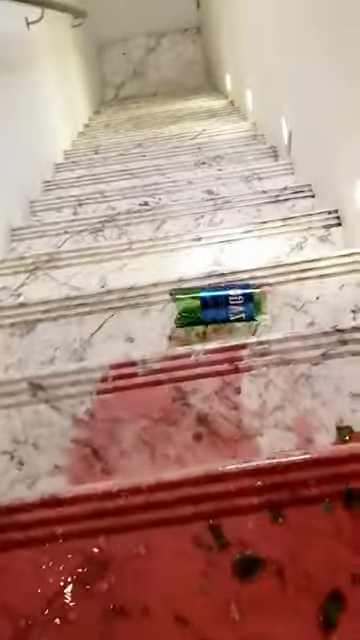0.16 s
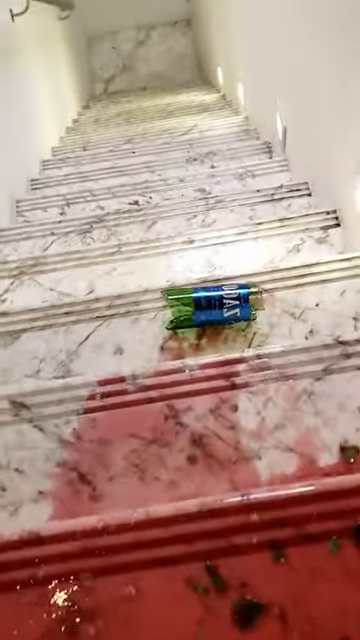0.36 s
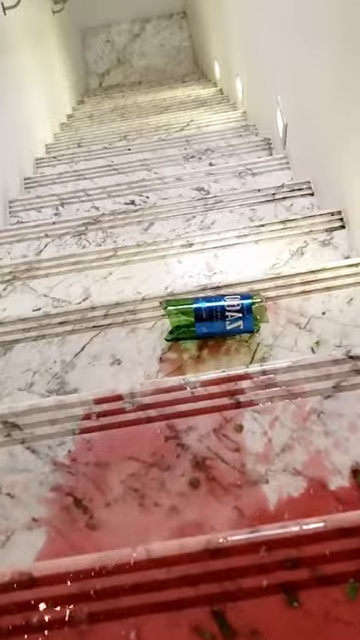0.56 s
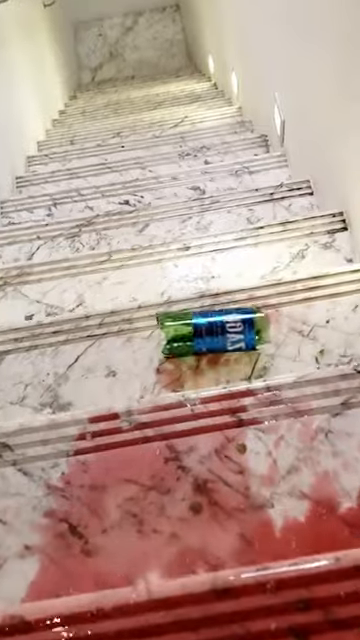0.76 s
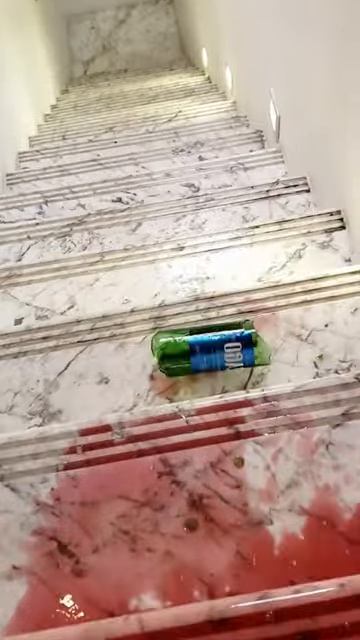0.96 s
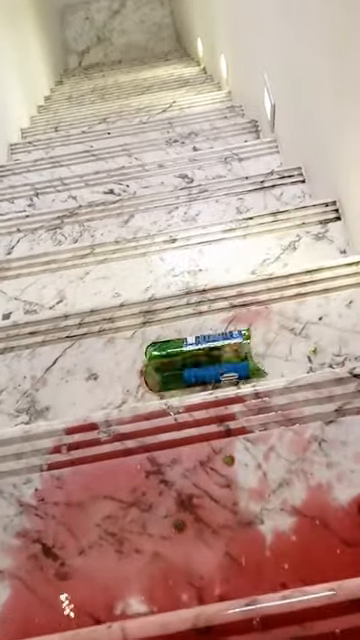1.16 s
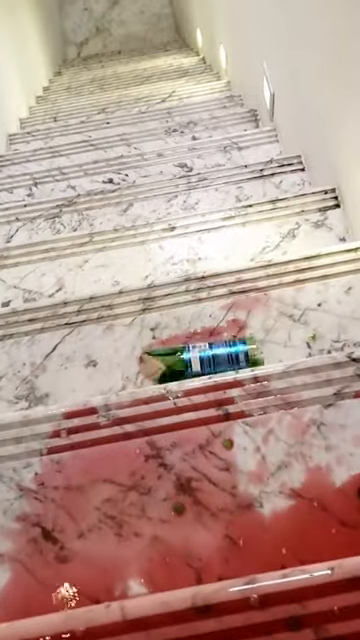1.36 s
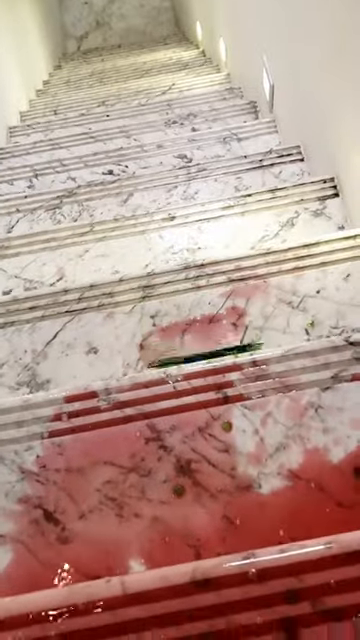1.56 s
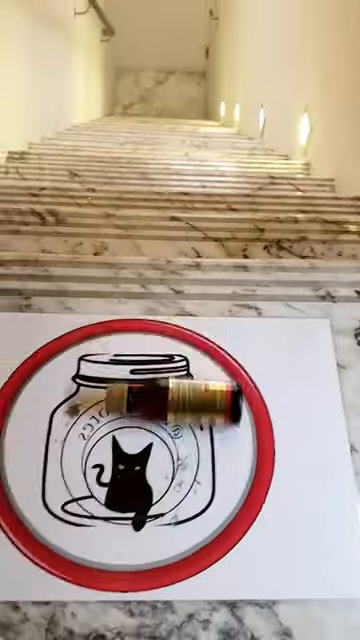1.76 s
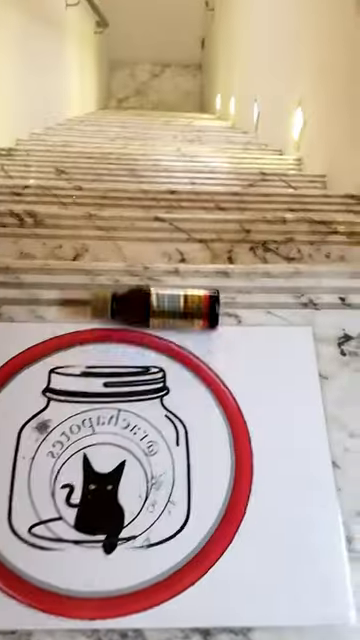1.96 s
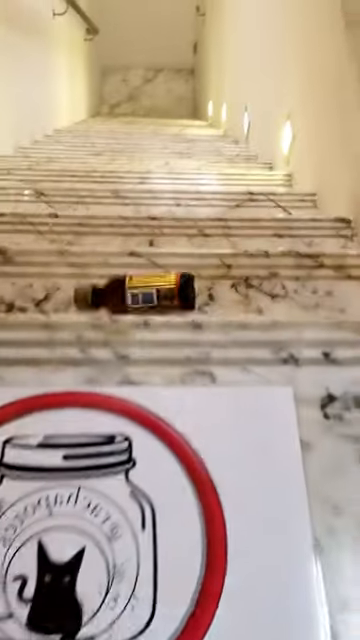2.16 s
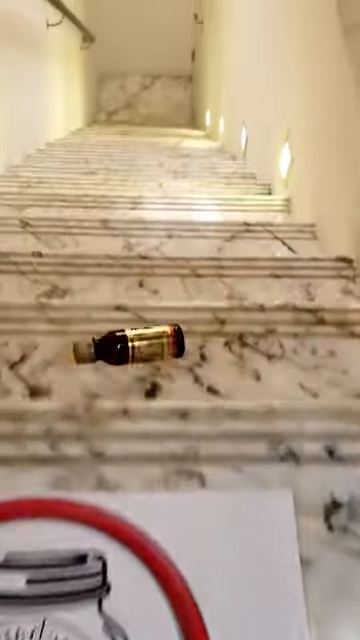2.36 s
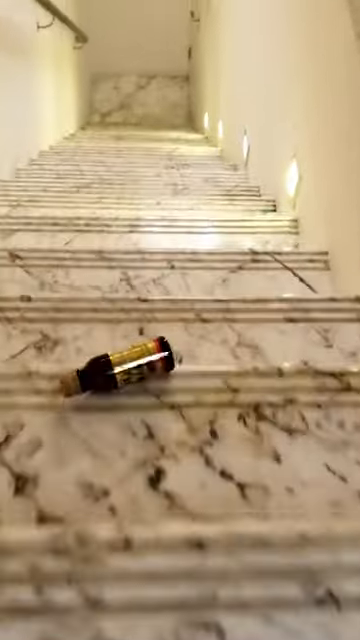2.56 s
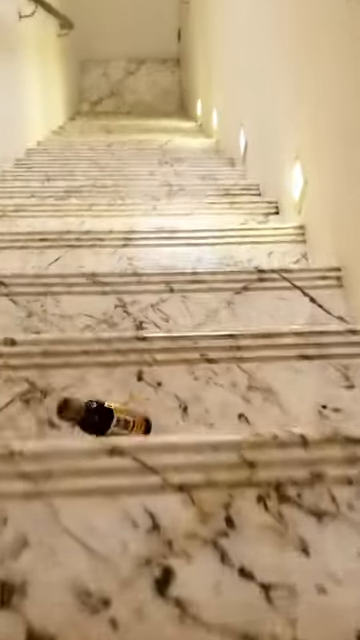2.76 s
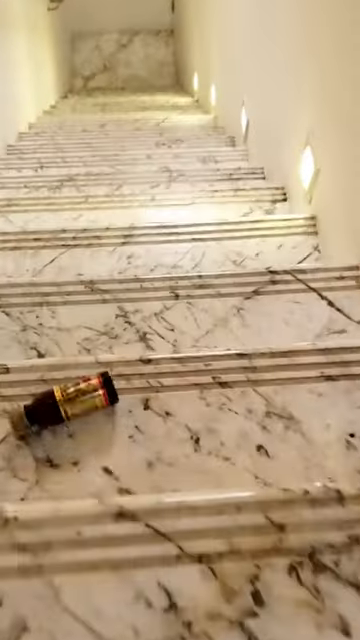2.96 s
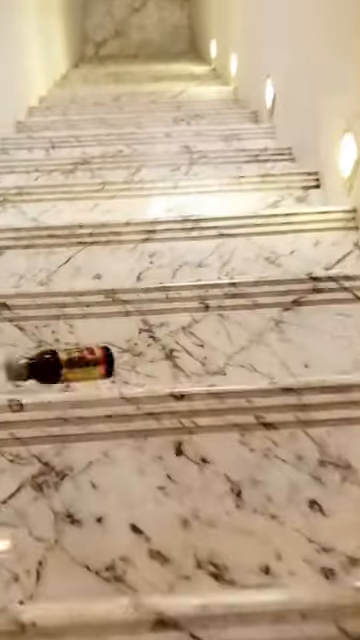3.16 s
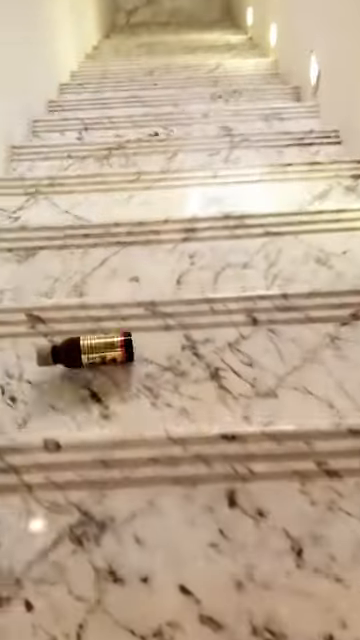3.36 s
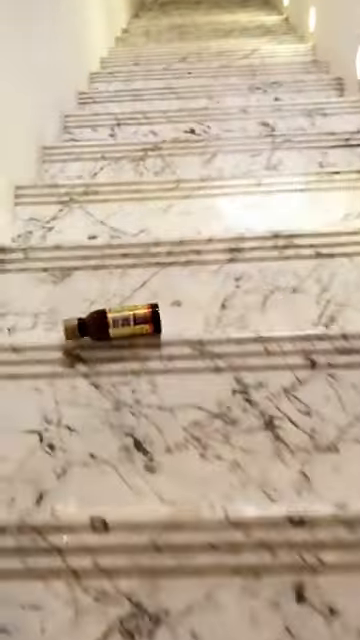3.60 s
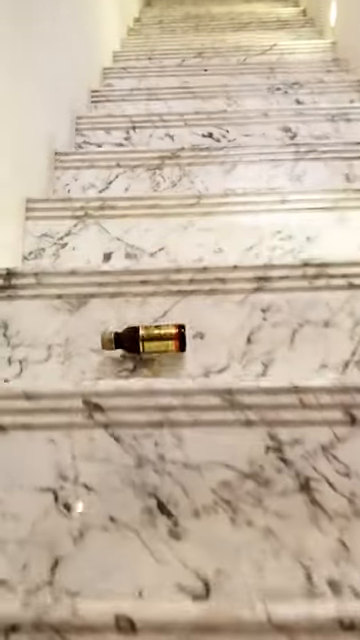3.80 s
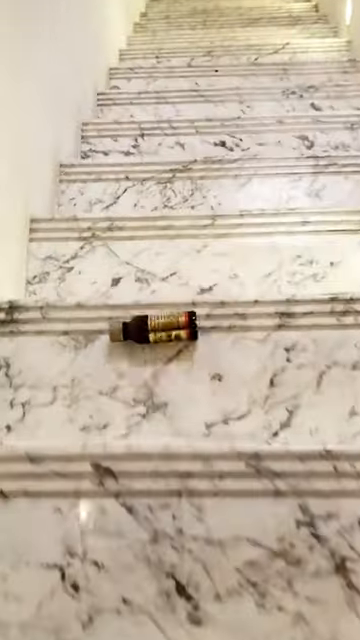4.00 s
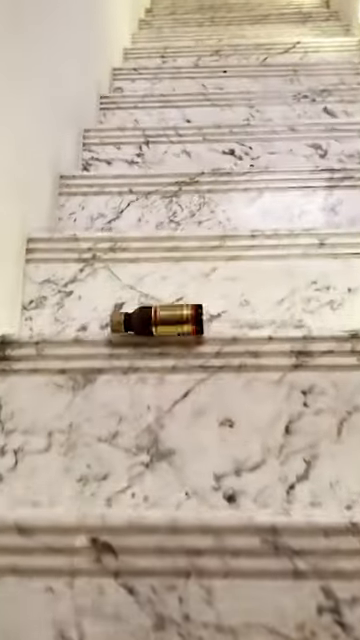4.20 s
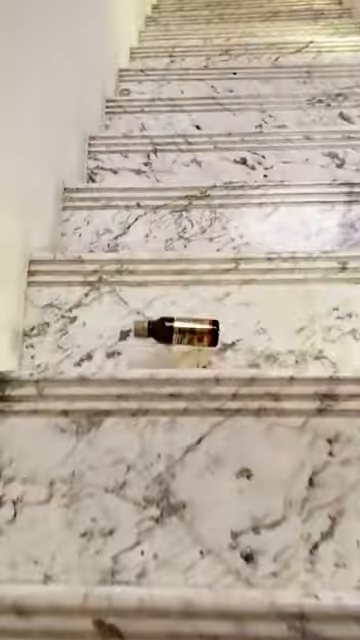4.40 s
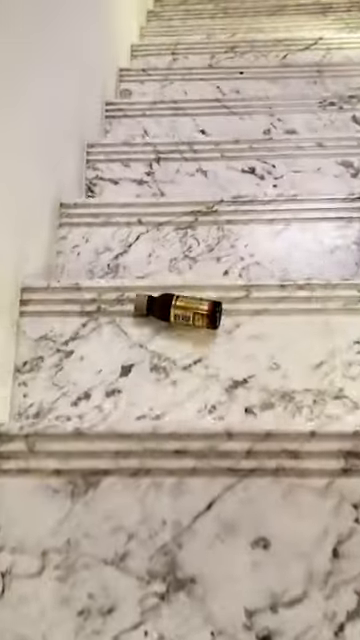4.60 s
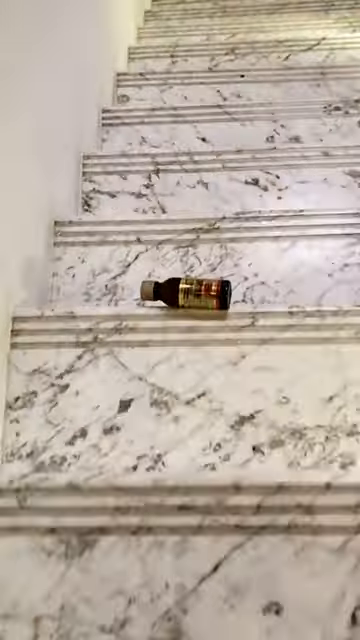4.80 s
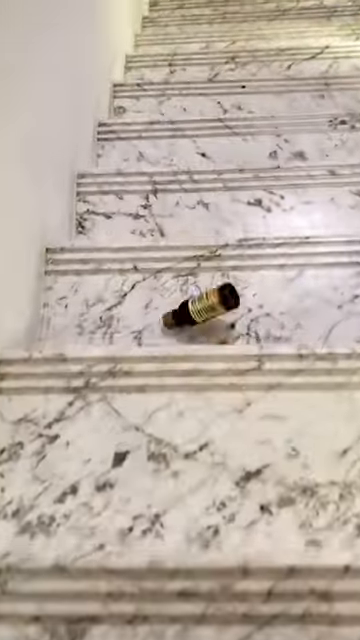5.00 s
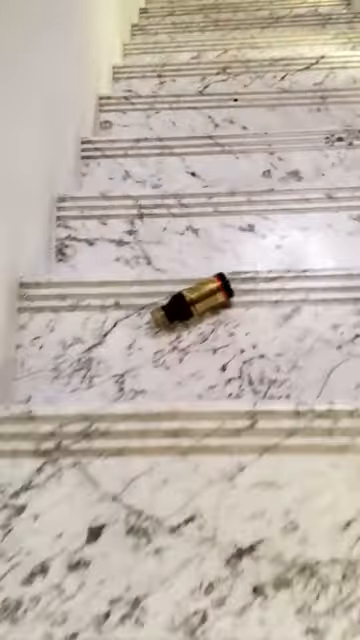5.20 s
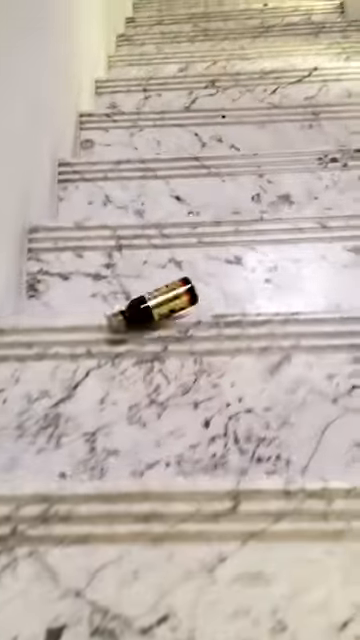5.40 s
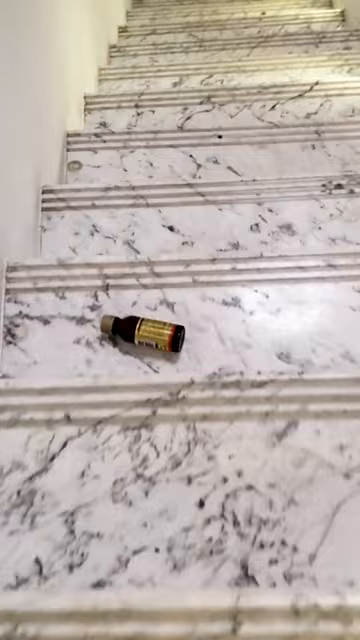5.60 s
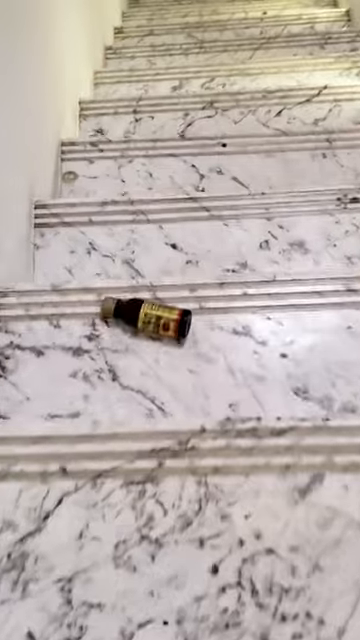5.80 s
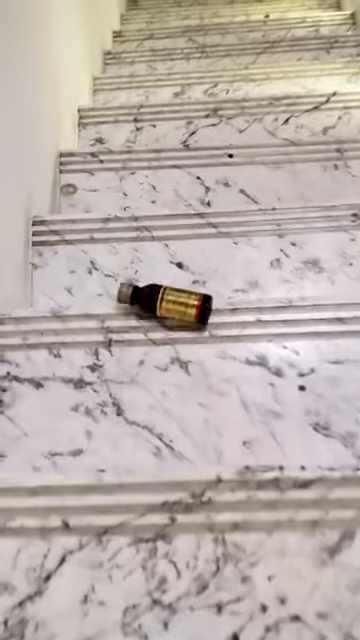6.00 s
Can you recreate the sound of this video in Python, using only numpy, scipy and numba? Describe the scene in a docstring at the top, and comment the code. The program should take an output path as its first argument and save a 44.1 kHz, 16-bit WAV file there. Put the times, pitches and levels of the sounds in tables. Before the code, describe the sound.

A glass bottle bumps faintly down stone steps over a low hum, then another clatters down with sharp, echoing knocks and clinks.

```python
"""Two glass bottles, one after the other, tumble down a marble staircase in a tall, echoing stairwell. First a
green bottle bumps down over a low hum and the hiss of the air. Each blow of glass on stone gives a short knock,
a few ringing tones and a long wash of echo. The hum stops just before the scene changes at about 1.83 s: a
brown bottle then clatters down, with soft thuds of hands and feet beneath it. All along, an automatic gain
control flattens the loud part of every echo."""
import sys
import numpy as np
from scipy import signal
from scipy.fft import rfft, irfft
from scipy.io import wavfile
from scipy.ndimage import uniform_filter1d
from numba import njit

SR = 44100
rng = np.random.default_rng(int(sys.argv[2]) if len(sys.argv) > 2 else 0)


def int16_out(signal):
    """Quantize to a 16-bit WAV file."""
    q = np.round(np.clip(np.atleast_2d(signal).T, -1, 1) * 32767)
    wavfile.write(sys.argv[1], SR, q.astype(np.int16))


N = 266805
T = np.arange(0, N + 32, 32) / SR  # coarse time steps for loudness curves
HZ = np.fft.rfftfreq(N, 1 / SR)

# Tone colour of the air behind the green bottle, then the brown one: f/Hz, level/dB
GREEN_AIR = [(59, 10), (100, 3.5), (160, 2), (197, -17), (255, -4.5), (583, -16), (5080, -68),
             (10900, -18.5), (16000, -12.5)]
BROWN_AIR = [(25, -5), (60, 2), (120, -5), (250, -5), (500, -5.5), (1500, -17), (6000, -21), (16000, -31.5)]
# Tone colour of the low noise in the hum and the thuds: f/Hz, level/dB
RUMBLE_COLOUR = [(40, -2), (120, -3.5), (200, -8), (350, -18.5), (600, -43)]
# The four tones of the hum: f/Hz, level/dB
HUM_TONES = [(39, -2), (64, -7), (103, 0), (151, -6.5)]
# How they swell: t/s, level of the lowest two/dB, level of the third/dB, level of the fourth/dB
HUM_SWELL = [(0.0, -53, -74, -46), (0.098, -45, -61, -70), (0.196, -41.5, -49, -54),
             (0.704, -35, -45.5, -33), (0.828, -30, -34, -69), (1.416, -30, -41, -52),
             (1.74, -35, -37.5, -54), (1.76, -42, -53, -29)]
# Thuds of hands and feet: t/s, level/dB, length/s
SOFT_THUDS = [(1.935, -39, 0.08), (2.662, -33, 0.024), (2.852, -41, 0.061), (3.084, -38, 0.018),
              (3.229, -42, 0.023), (3.738, -41, 0.06), (3.865, -36, 0.015), (4.164, -42, 0.03),
              (4.445, -46, .06), (5.102, -46, 0.037), (5.282, -41, 0.09), (5.53, -39, .03),
              (6.02, -33.5, 0.062)]
# Tone colour of the echo: f/Hz, level/dB
ECHO_COLOUR = [(120, -64), (200, -15.5), (491, -14), (538, -12.5), (590, -13.5), (1120, -3), (3190, -1),
               (5630, -5.5), (6760, -8.5), (14300, -4), (16000, -7)]
# Base time the echo takes to fade by 60 dB: f/Hz, fade time/s
ECHO_FADE = [(200, 0.77), (600, 0.93), (1500, 0.82), (3000, 0.73), (6000, 0.64), (10000, 0.49),
             (16000, 0.39)]
# Where the echo's bass, middle, upper middle and treble lie: f/Hz
ECHO_RANGES = (900, 2500, 5000, 11000)
# Ringing tones of each bottle: f/Hz, width/Hz, level/dB, time to fade by 60 dB/s
GREEN_TONES = [(928, 180, -4, 0.72), (1161, 43, -4, 0.72), (1946, 30, 15.5, 0.6), (4200, 50, 3, 0.37),
               (4500, 40, -9, .5), (5281, 50, -8, .5), (7060, 150, 13.5, 0.49)]
BROWN_TONES = [(647.3, 28, 3, 0.24), (701, 41, -10, 1), (777, 180, -8.5, 0.77), (888, 20, -3, 0.24),
               (1038, 41, 2, 0.18), (2533, 20, -3, 0.41), (4200, 57, 0, .1), (4450, 72, 4.5, 0.19)]
# Short tones inside a knock: f/Hz, level/dB, time to fade by 60 dB/s
KNOCK_TONES = [(763, -16, 0.014), (1435, -14.5, 0.028), (2062, -1.5, 0.013), (2780, -7, 0.019),
               (3330, -3, 0.0047), (4370, -4.5, 0.0067)]
# Blows of glass on stone: t/s, knock level/dB, brightness/(dB per octave), echo level/dB, bass/dB,
# upper middle/dB, treble/dB, rattle length/s, late echo/dB, ring centre/Hz, ring level/dB.
# The dB columns after the echo level are added to it.
STAIR_BLOWS = [(-.071, -49, 0, -12, -5.5, 5.5, 12.5, 0.001, -3, 940, -6),
               (0.861, -54, -6, -65, 5, -4, 19, .01, -20, 930, 10),
               (.943, -30, 4, -43, 7, 5, -2, .01, -20, 920, 4.5),
               (.965, -32, 5, -42.5, -25, 6.5, 11, 0.052, 1, 920, -5),
               (1.255, -70, 0, -55.5, -9.5, 6.5, 12, .1, -9, 920, 1.5),
               (1.459, -49, 11, -47.5, 2, 5.5, 13.5, 0.018, 10, 1080, -11),
               (1.519, -14.5, -3, -23.5, 3.5, 15.5, 11, 0.004, -34, 1220, 9),
               (1.75, -60, 0, -46, 12, 4, 16.5, 0.0033, -31.5, 1210, -11),
               (1.835, -7, -8, -29, 13, -0.5, 6, 0.0087, -8, 694, 5),
               (1.879, -66, -9, -38.5, 0, -12, -23, 0.012, 4, 650, 15),
               (1.945, -51, 0, -20.5, 10, -8, -0.5, 0.05, -22, 686, 7),
               (1.965, -30, 0, -27, -3, -11, -6, 0.029, -20, 4400, 5.5),
               (1.987, 4, -8, -8.5, 1, -7, -18, 0.01, -23, 4380, 9),
               (2.047, 7, -5.5, -9, -8, -4.5, -58, 0.057, -13, 810, -2.3),
               (2.14, -40, 0, -23, -15, -17, -19, .12, -18, 830, 1.5),
               (2.2, -40, 8, -26, -1, -15.5, -11, 0.075, -20, 4320, -10),
               (2.279, 2, -5.5, -17, -15, 3, -1, 0.0091, -20, 4400, -20),
               (2.294, -1, 9, -4.5, -13.5, 0, -3, 0.12, -1, 4360, -15.5),
               (2.72, -52, 5, -26.5, -8, -7, -6.5, 0.013, -20, 805, -13),
               (2.783, 1.5, -3, -4, -13.5, -6.5, -2.7, 0.1, 0.5, 830, -25),
               (3.281, 0.5, -0.5, -5.5, -8.5, -4, -4.5, 0.055, 1, 814, -26),
               (3.776, 2.5, 5.5, -5, -12, -1.5, -7, 0.12, -6.5, 800, -50),
               (4.146, 1, 0.5, -23, -11, -4.5, -19, 0.021, -38, 847, -14),
               (4.371, 5, 6.5, 0.5, -20, -0.3, -3.5, 0.074, 0.5, 790, -39),
               (4.965, 6, 0, -2.7, -18, 3.5, -1.5, 0.14, -4.5, 770, -37),
               (5.555, 6.5, 6.5, -1.6, -12, -7, -6.5, 0.12, -2, 2470, -2.5)]
# Sharp knocks of the bouncing bottle, with no echo of their own:
# t/s, level/dB, brightness/(dB per octave)
BOUNCES = [(0.624, -53, 7), (1.534, 2, 8), (2.055, 7.5, -4.5), (2.306, -3.5, 17), (2.804, -3, -9),
           (3.794, -1, 6), (3.81, 0, 11), (4.14, -10, 2), (4.171, -4.5, 4), (4.377, 2, 2.5), (4.977, 7, 10),
           (5.574, 3, 5)]

BROWN_START_S, HUM_END_S = 1.834, 1.765
FIRST_WALL_S, FAR_WALL_S = 0.00055, 0.07  # echo delays after the blow and after its rattle
BUILD_S, RATTLE_BUILD_SHARE, LATE_BUILD_S = 0.0078, 0.077, 0.08  # how slowly an echo builds up
DROP_DB_PER_RATTLE_S, DROP_S, DROP_ABOVE_HZ = -21.5, 0.0056, 1230  # step down as a rattle stops
LATE_DB_PER_OCTAVE, RING_DB_PER_OCTAVE = -2, -32


def undb(db):
    """Turn decibels into a plain multiplier."""
    return 10 ** (np.asarray(db) / 20)


def at_pitch(hz, table):
    """Read between the rows of a table of f/Hz and value, with octaves evenly spaced."""
    at, value = np.transpose(table)
    return np.interp(np.log(np.maximum(hz, 1)), np.log(at), value)


def to_audio(curve, times=T):
    """Fill in a coarse curve so that every sample has a value."""
    return np.interp(np.arange(N) / SR, times, curve)


def wander(rate_hz):
    """A smooth random wobble, typically of size 1."""
    span = int(SR / rate_hz)
    steps = np.repeat(rng.standard_normal(N // span + 1), span)
    wobble = uniform_filter1d(uniform_filter1d(steps, span), span)[:N]
    return wobble / wobble.std()


def noise(likeness):
    """Spectrum of stereo white noise; likeness runs from 0 (sides unrelated) to 1 (the same)."""
    mid, side = rfft(rng.standard_normal((2, N)))
    likeness = np.clip(likeness, 0, 1)
    mid, side = np.sqrt(1 + likeness) * mid, np.sqrt(1 - likeness) * side
    return np.array([mid + side, mid - side])


def shaped(white, gain):
    """Colour a noise spectrum and turn it into sound of average power 1."""
    sound = irfft(white * gain, N)
    return sound / np.sqrt(np.mean(sound ** 2))


def air(colour, db):
    """The rush of room air, its bass nearly the same in both ears."""
    gain = undb(at_pitch(HZ, colour)) * (HZ > colour[0][0])
    return shaped(noise(.9 - HZ / 500), gain) * undb(db)


def hum(drift_hz=1.44, waver_db=2.0):
    """Low wavering tones over a rumble, a little louder and later on the right."""
    when, low_db, third_db, fourth_db = np.transpose(HUM_SWELL)
    out = air(RUMBLE_COLOUR, to_audio(low_db, when) - 11.5)
    for (hz, db), swell_db in zip(HUM_TONES, (low_db, low_db, third_db, fourth_db)):
        phase = 2 * np.pi * np.cumsum(hz + drift_hz * wander(6.64)) / SR - np.array([[0], [.3]])
        level = undb(db + to_audio(swell_db, when) + waver_db * wander(14.93))
        out += np.sqrt(2) * level * np.sin(phase)
    fade_out = to_audio(np.clip((HUM_END_S - T) / 0.022, 0, 1))
    return out * undb([[-1.5], [1.5]]) * fade_out


def thuds():
    """Hands and feet make short swells of low noise."""
    when, db, length = np.transpose(SOFT_THUDS)[:, :, None]
    swells = undb(db) * np.exp(-((T - when) / length) ** 2)
    return air(RUMBLE_COLOUR, 0) * to_audio(swells.sum(axis=0))


def shimmer(white, depth_db=3.5):
    """The echo shimmers: random patches of noise, about 80 Hz by 0.1 s, rise or sink."""
    grid = signal.stft(irfft(white, N), nperseg=1024, noverlap=768)[2]
    patches = uniform_filter1d(rng.standard_normal(grid.shape[1:]), size=16, axis=1)
    patches = uniform_filter1d(patches, size=2, axis=0)
    grid *= undb(depth_db * patches / patches.std())
    return rfft(signal.istft(grid, nperseg=1024, noverlap=768)[1][:, :N])


def stairwell():
    """Sound scattered by the walls blurs into noise, here split into bands half an octave apart."""
    wash = shimmer(noise(np.maximum(0.088, 1 - HZ / 1500))) * undb(at_pitch(HZ, ECHO_COLOUR))
    wash /= np.std(irfft(wash * ((HZ > 1500) & (HZ < 5000)), N))
    octave = np.log2(np.maximum(HZ, 1))
    return [(2 ** centre, irfft(wash * np.clip(1 - 2 * abs(octave - centre), 0, 1), N))
            for centre in np.arange(8.5, 14.1, .5)]


def tails(hz, when, db, fade_s, hold_s, build_s):
    """Loudness at one pitch: each blow's tail builds up, holds while the glass rattles, then dies."""
    age = np.maximum(T - when[:, None] - FIRST_WALL_S, 0)
    after = np.maximum(age - hold_s[:, None], 0)
    rise = 1 - np.exp(-age / build_s[:, None])
    drop_db = DROP_DB_PER_RATTLE_S * hold_s[:, None] / (1 + (DROP_ABOVE_HZ / hz) ** 2)
    fall_db = drop_db * (1 - np.exp(-after / DROP_S)) - 60 * after / fade_s
    power = (rise * undb(db[:, None] + fall_db)) ** 2
    return to_audio(np.sqrt(power.sum(axis=0)))


def echo(blows, bands, fade_share, rattle_top_hz=6370):
    """The near walls answer each blow at once; the far end answers later and duller."""
    when, _, _, echo_db, bass, upper, treble, rattle_s, late_db, _, _ = blows.T
    colours = [list(zip(ECHO_RANGES, (low, 0, up, top))) for low, up, top in zip(bass, upper, treble)]
    starts = np.r_[when, when + rattle_s + FAR_WALL_S]  # near answers first, then far ones
    out = 0
    for hz, band in bands:
        near_db = echo_db + [at_pitch(hz, colour) for colour in colours]
        far_db = near_db + late_db + LATE_DB_PER_OCTAVE * np.log2(hz / ECHO_RANGES[1])
        shorten = min(1, rattle_top_hz / hz)  # the highest bands rattle more briefly
        hold_s = np.r_[shorten * rattle_s, np.zeros(len(when))]
        near_build_s = shorten * (BUILD_S + RATTLE_BUILD_SHARE * rattle_s)
        build_s = np.r_[near_build_s, np.full(len(when), LATE_BUILD_S)]
        fade_s = fade_share * at_pitch(hz, ECHO_FADE)
        out += band * tails(hz, starts, np.r_[near_db, far_db], fade_s, hold_s, build_s)
    return out


def ringing(blows, tones):
    """Struck glass rings at its own pitches; each blow favours those near its ring centre."""
    when, _, _, echo_db, _, _, _, rattle_s, _, centre_hz, ring_db = blows.T
    build_s = BUILD_S + RATTLE_BUILD_SHARE * rattle_s
    white, out = noise(0.16), 0
    for hz, width, db, fade_s in tones:
        tone = shaped(white, 1 / (1 + (2 * (HZ - hz) / width) ** 2))
        level_db = echo_db + ring_db + db + RING_DB_PER_OCTAVE * abs(np.log2(hz / centre_hz))
        out += tone * tails(hz, when, level_db, fade_s, rattle_s, build_s)
    return out


def knocks(edge_db=-27, scatter=.1):
    """Glass hits stone: a sharp edge of noise and a few quickly dying tones, new in pitch each time."""
    out, t = np.zeros(N + 800), np.arange(800) / SR
    hz, tone_db, fade_s = np.transpose(KNOCK_TONES)[:, :, None]
    fade = undb(-60 * t / fade_s) * (1 - np.exp(-t / 0.00013))
    for when, db, brightness in [blow[:3] for blow in STAIR_BLOWS if blow[0] > 0] + BOUNCES:
        pitch = hz * (1 + scatter * rng.uniform(-1.69, 1, hz.shape))
        tones = np.sin(2 * np.pi * pitch * t) * rng.choice([-1, 1], hz.shape)
        knock = (undb(tone_db + brightness * np.log2(hz / 2000)) * fade * tones).sum(axis=0)
        hiss = np.diff(rng.standard_normal(len(t) + 1))
        edge = undb(edge_db + brightness) * hiss * np.exp(-t / 0.0074)
        at = int((when + .0008) * SR)
        out[at:at + len(t)] += undb(db) * (knock / abs(knock).max() + edge)
    return signal.sosfilt(signal.butter(2, 450, "high", fs=SR, output="sos"), out[:N])


def scene():
    """The green bottle and its background give way to the brown bottle and its own."""
    bands, blows = stairwell(), np.array(STAIR_BLOWS)
    early = blows[:, 0] < BROWN_START_S
    green = echo(blows[early], bands, fade_share=0.93) + ringing(blows[early], GREEN_TONES)
    brown = echo(blows[~early], bands, fade_share=0.99) + ringing(blows[~early], BROWN_TONES)
    brown += air(BROWN_AIR, db=-43 + 2.5 * wander(12)) + thuds()
    hits = knocks()
    green += hum() + air(GREEN_AIR, db=-48)
    green_share = to_audio(np.clip((BROWN_START_S - T) / 0.0022, 0, 1))
    return green_share * green + (1 - green_share) * brown + hits


@njit
def follow(power, rise_s, fall_s):
    """A running average of power, with one response time going up and another going down."""
    out, level = np.empty(len(power)), power[:400].mean()
    for i in range(len(power)):
        level += (power[i] - level) / (SR * (rise_s if power[i] > level else fall_s))
        out[i] = level
    return out


def record(dry, knee_db=-28.5, ratio=2.3, bass_hz=250, top_hz=15700):
    """Gain control turns loud moments down above the bass; then the highest treble is removed."""
    upper = signal.sosfilt(signal.butter(2, bass_hz, "high", fs=SR, output="sos"), dry)
    power = follow(np.mean(upper ** 2, axis=0), rise_s=0.0088, fall_s=0.0056)
    gain = (1 + power / undb(2 * knee_db)) ** ((1 / ratio - 1) / 2)
    held = dry + (gain - 1) * upper
    return signal.sosfilt(signal.ellip(10, .2, 80, top_hz, fs=SR, output="sos"), held)


dry = scene()
out = record(dry)
int16_out(out)
```